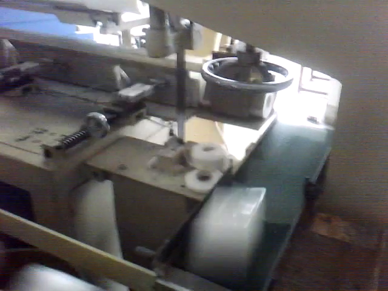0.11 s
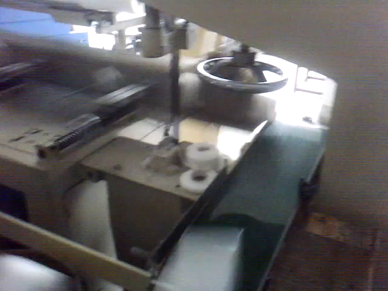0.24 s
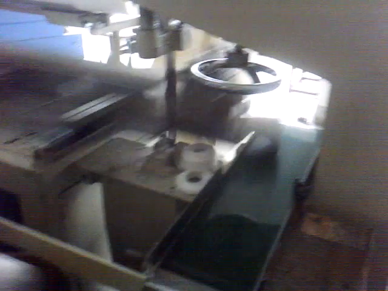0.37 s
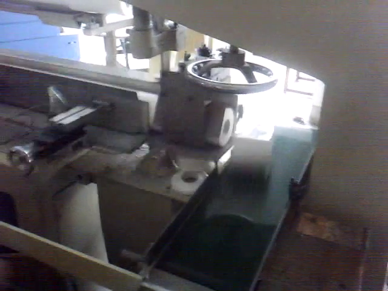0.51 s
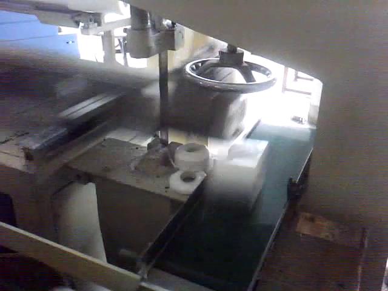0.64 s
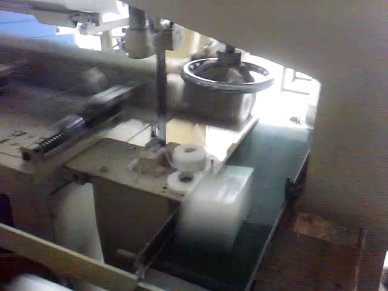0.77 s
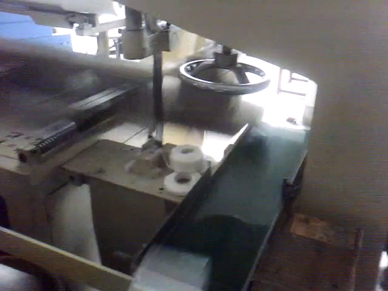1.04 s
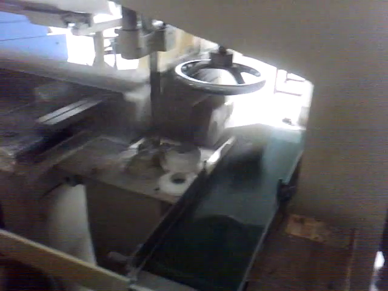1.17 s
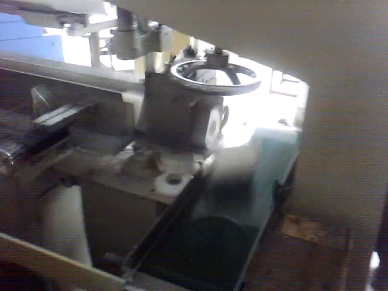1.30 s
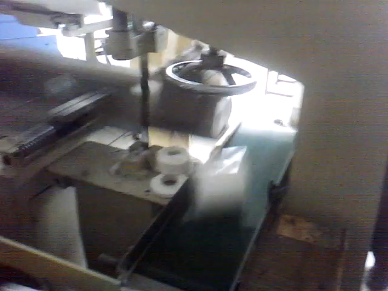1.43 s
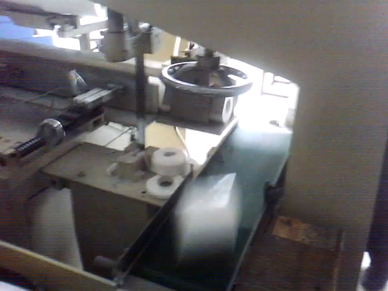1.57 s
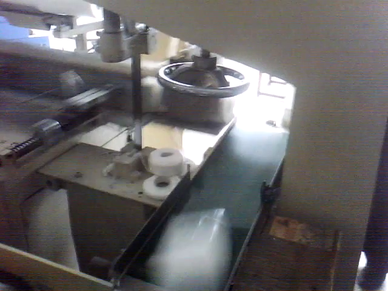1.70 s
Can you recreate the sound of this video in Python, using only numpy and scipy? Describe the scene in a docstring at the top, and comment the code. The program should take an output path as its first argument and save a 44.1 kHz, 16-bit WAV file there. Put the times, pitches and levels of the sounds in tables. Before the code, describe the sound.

Loud industrial machine clatter starts abruptly and sinks to a low drone with knocks.

```python
"""A tissue converting machine in a workshop, heard through a small narrow-band microphone. At 0.21 s its roar
starts abruptly: rumble, frame drone, dense clatter and the hiss of running paper, all coloured by fixed
resonances, with whining gears and whistling bearings. Half a second later the roar sinks. Brief narrow bands of
noise, low to high, swell and fade with a watery sound, and the mechanism knocks as packs go down the belt."""
import sys
import numpy as np
from scipy import signal
from scipy.fft import rfft, irfft
from scipy.io import wavfile
from scipy.ndimage import uniform_filter1d

SR = 44100
rng = np.random.default_rng(int(sys.argv[2]) if len(sys.argv) > 2 else 0)


def bounce(signal):
    """Save signal as a 16-bit WAV file at the path given by the first command-line argument."""
    frames = np.transpose(np.atleast_2d(signal))
    limited = np.clip(frames, -1, 1)
    pcm = np.round(limited * 32767).astype(np.int16)
    wavfile.write(sys.argv[1], SR, pcm)


N = 79380
T = np.arange(N) / SR
HZ = np.maximum(np.arange(N // 2 + 1) * SR / N, 1)

# envelope of clatter and gears: (time [s], level [dB])
MID_LEVEL = [(.21, -22.5), (.26, -20.5), (.315, -18), (.4, -23), (.45, -21), (.53, -21.5), (.635, -20),
             (.72, -27.5), (.77, -37.5), (.815, -34), (.87, -40.5), (.99, -41.5), (1.075, -41), (1.14, -48),
             (1.24, -44), (1.41, -45), (1.52, -49), (1.56, -47), (1.62, -49.5), (1.71, -51.5), (1.8, -52.5)]
# envelope of paper hiss and bearings: (time [s], level [dB])
TREBLE_LEVEL = [(.21, -26.5), (.25, -28), (.31, -31), (.44, -29), (.53, -31), (.6, -29.5), (.7, -31),
                (.77, -42.5), (.83, -44.5), (.9, -45), (.99, -49), (1.045, -57.5), (1.12, -53),
                (1.17, -57.5), (1.23, -53), (1.3, -53.5), (1.41, -49.5), (1.52, -52), (1.6, -55),
                (1.7, -56.5), (1.8, -64)]


def from_db(db):
    """Decibels to gain."""
    return 10 ** (np.asarray(db) / 20)


def unit_rms(x):
    """Scale to rms 1."""
    return x / np.sqrt(np.mean(x ** 2) + 1e-20)


def envelope(points):
    """Gain over time from (time [s], level [dB]) points."""
    return from_db(np.interp(T, *np.transpose(points)))


def steady(x, window_s=0.028):
    """Even out slow random swings to rms 1."""
    return x / np.sqrt(uniform_filter1d(x ** 2, int(window_s * SR)) + 1e-20)


def noise_around(centre_hz, half_width_hz):
    """Noise around one frequency, rms 1; centred on 0 Hz, a slow drift."""
    gain = 1 / (1 + ((HZ - centre_hz) / half_width_hz) ** 2)
    return unit_rms(irfft(rfft(rng.standard_normal(N)) * gain, N))


def through_machine(drive, colour):
    """Shape an excitation by a broad colour and the machine's resonances; rms 1."""
    # modes of frame, rollers and guards: (frequency [Hz], width [Hz], lift [dB])
    resonances = [(146, 20, 4), (199, 18, 4), (432, 50, 2), (786, 25, 4), (955, 45, 5), (1163, 25, 5),
                  (1535, 50, 4), (1690, 25, 4), (2046, 35, 3), (2490, 70, 4), (2790, 60, 4), (3910, 55, 7),
                  (4670, 60, 5), (4925, 55, 7), (5320, 50, 3), (5720, 50, 3), (6150, 60, 4), (6675, 65, 9),
                  (7040, 40, 5)]
    hz, db = np.transpose(colour)
    gain_db = np.interp(np.log(HZ), np.log(hz), db, right=-120)
    for centre_hz, width_hz, lift_db in resonances:
        gain_db += lift_db / (1 + (2 * (HZ - centre_hz) / width_hz) ** 2)
    return steady(unit_rms(irfft(rfft(drive) * from_db(gain_db), N)))


def rattle(contacts_per_s=2500, spread_db=3, contact_share=0.62):
    """Dense small contacts of uneven size over smooth friction noise."""
    sizes = from_db(spread_db * np.minimum(rng.exponential(1, N), 4))
    signs = rng.choice([-1, 1], N)
    contacts = unit_rms(sizes * signs * (rng.random(N) < contacts_per_s / SR))
    return np.sqrt(contact_share) * contacts + np.sqrt(1 - contact_share) * rng.standard_normal(N)


def workshop(level_db=-53.5):
    """Even background noise, coloured by the machine's resonances."""
    # spectrum: (frequency [Hz], relative density [dB])
    colour = [(25, -8), (70, -3.5), (130, 15.5), (500, -4.5), (2000, -2), (2800, 1), (3200, -6),
              (4300, -11.5), (7000, -17.5), (7600, -43)]
    return from_db(level_db) * through_machine(rng.standard_normal(N), colour)


def friction_tone(hz, waver_hz, flutter_depth=0.55):
    """Friction-driven tone, wavering in pitch and strength; rms 1."""
    rate_hz = 1.8 * waver_hz
    phase = 2 * np.pi * np.cumsum(hz + waver_hz * noise_around(0, rate_hz)) / SR
    strength = 1 + flutter_depth * noise_around(0, rate_hz)
    return unit_rms(strength * np.sin(phase))


def whine():
    """Gears whine and bearings whistle around fixed pitches, following the roar's level."""
    # gear tones: (frequency [Hz], level re MID_LEVEL [dB])
    gear_tones = [(147, -20.5), (200, -19), (424, -26), (786, -24.5), (951, -22.5), (1000, -15),
                  (1163, -33.5), (1418, -22), (1531, -23), (1690, -31.5), (1739, -25.5), (2045, -27.5)]
    # bearing tones: (frequency [Hz], level re TREBLE_LEVEL [dB])
    bearing_tones = [(4915, -16), (6681, -13), (7043, -19.5)]
    gears = sum(from_db(db) * friction_tone(hz, waver_hz=5.3) for hz, db in gear_tones)
    bearings = sum(from_db(db) * friction_tone(hz, waver_hz=12) for hz, db in bearing_tones)
    return envelope(MID_LEVEL) * gears + envelope(TREBLE_LEVEL) * bearings


def narrow_band(hz, spread_hz, clean_spread_hz=45):
    """A line in a band of noise, the broader the noisier; rms 1."""
    noise = noise_around(hz, spread_hz)
    line = unit_rms(np.sin(2 * np.pi * (hz * T + rng.random())))
    line_share = np.exp(-spread_hz / clean_spread_hz)
    return steady(np.sqrt(line_share) * line + np.sqrt(1 - line_share) * noise)


def swells():
    """Brief narrow bands of noise, low to high, swell and fade with a watery sound."""
    # (peak time [s], length [s], frequency [Hz], spread [Hz], peak level [dB])
    swell_rows = [(0.243, 0.046, 6680, 25, -31.5), (0.307, 0.053, 533, 20, -23),
                  (0.435, .018, 4600, 104, -26), (.441, 0.093, 950, 12, -31),
                  (.596, 0.044, 5520, 160, -30.5), (0.619, 0.14, 1660, 260, -23.5),
                  (.625, 0.072, 1003, 130, -23.5), (.684, 0.031, 426.6, 15, -18.5),
                  (.683, 0.15, 5310, 76, -36), (0.714, 0.039, 4150, 200, -46),
                  (.72, 0.077, 6100, 140, -41.5), (0.686, .2, 6710, 83, -34),
                  (0.716, 0.061, 233.7, 12, -25.5), (.738, 0.029, 415, 40, -22),
                  (0.817, .056, 398, 40, -28.5), (0.721, 0.07, 1576, 51, -27.5),
                  (0.776, 0.065, 296.3, 18, -29), (.756, .09, 815, 35, -33), (0.791, .115, 1545, 25, -34),
                  (.82, .12, 6900, 86, -42), (.823, 0.075, 926, 42, -30), (.825, .06, 1057, 39, -36),
                  (0.838, .16, 245, 22, -35), (.846, 0.043, 1920, 25, -35.5), (0.86, 0.099, 5447, 31, -38),
                  (.905, 0.068, 7068, 53, -46), (0.911, 0.054, 4680, 28, -44),
                  (0.899, 0.078, 6665, 33, -39), (0.917, 0.08, 939, 46, -35),
                  (0.904, 0.072, 5230, 110, -40), (0.927, 0.14, 2534, 45, -46),
                  (.905, .05, 370.5, 31, -33.5), (0.953, 0.055, 430.6, 30, -35),
                  (0.964, 0.14, 6650, 50, -44), (0.973, 0.15, 5390, 190, -42.5),
                  (0.992, 0.057, 4925, 22, -39.5), (.997, .074, 121, 12.4, -32.5),
                  (1.027, 0.16, 662, 145, -36), (1.06, 0.075, 1560, 44, -39.5),
                  (1.08, 0.059, 1062, 41, -39.5), (1.098, 0.046, 840, 40, -39),
                  (1.224, 0.055, 6720, 49, -55), (1.429, 0.19, 436, 21, -42), (1.433, 0.13, 6680, 31, -46),
                  (1.39, .089, 954, 94, -47.5), (1.561, 0.051, 1060, 31, -50), (1.567, 0.069, 262, 43, -47),
                  (1.592, .055, 417, 25, -39.5), (1.657, 0.053, 518.5, 12, -46),
                  (1.68, 0.054, 294.6, 6.4, -35), (1.724, 0.034, 295, 9, -40), (1.71, 0.06, 6710, 28, -57)]
    out = np.zeros(N)
    for peak_s, length_s, hz, spread_hz, db in swell_rows:
        position = np.clip((T - peak_s) / length_s, -.5, .5)
        arch = np.abs(np.cos(np.pi * position)) ** 0.8  # slightly flattened top
        out += from_db(db) * arch * narrow_band(hz, spread_hz)
    return out


def blow(age_s, rise_s, hold_s, t60_s):
    """Impact envelope: linear attack, hold, exponential tail."""
    decay = np.exp(-np.log(1000) * np.maximum(age_s - hold_s, 0) / t60_s)
    return np.clip(age_s / rise_s, 0, 1) * decay


def knocks():
    """The mechanism knocks: a crack at first contact, a short clack, a slower thump of the frame."""
    # impacts: (time [s], thump level [dB], clack level [dB])
    impacts = [(0.426, -44.5, -23), (.526, -26.5, -34.5), (.583, -48.5, -27), (0.797, -46, -34.5),
               (0.966, -28, -44.5), (1.036, -39, -51), (1.204, -47, -55), (1.262, -45, -50.5),
               (1.474, -43, -49), (1.639, -34, -41.5)]
    # spectra: (frequency [Hz], relative density [dB])
    thump_colour = [(20, -8.5), (45, -10.5), (72, -21), (98, -30), (122, 12), (170, -13.5), (400, -3.5),
                    (520, -7), (750, -28), (1500, -55.5)]
    clack_colour = [(300, -16.5), (550, -7.5), (1000, -11.5), (1450, -2.5), (2000, -0.5), (2400, -12),
                    (2900, -15.5), (3600, -25), (4700, -14.5), (7000, -23), (7600, -52)]
    thump_noise = through_machine(rng.standard_normal(N), thump_colour)
    clack_noise = through_machine(rattle(), clack_colour)
    out = np.zeros(N)
    for start_s, thump_db, clack_db in impacts:
        age_s = T - start_s
        crack = from_db(-3.5) * blow(age_s, rise_s=0.00079, hold_s=0, t60_s=0.014)
        clack = blow(age_s, rise_s=0.00079, hold_s=0.0044, t60_s=0.088)
        thump = blow(age_s, rise_s=0.015, hold_s=0.017, t60_s=0.069)
        out += from_db(clack_db) * clack_noise * (crack + clack)
        out += from_db(thump_db) * thump_noise * thump
    return out


def roar():
    """Rumble, frame drone, clatter and paper hiss, with a broad rush at first."""
    # envelopes: (time [s], level [dB])
    rumble_level = [(.21, -26.5), (.3, -31), (.38, -28), (.44, -21), (.54, -28.5), (.64, -37.5), (.72, -33),
                    (.78, -37), (.885, -37.5), (.915, -56.5), (.95, -62), (.975, -36), (1.05, -30.5),
                    (1.132, -35.5), (1.15, -64), (1.19, -47), (1.235, -36), (1.31, -53.5), (1.4, -52),
                    (1.48, -44), (1.52, -59), (1.59, -50), (1.66, -52), (1.72, -52), (1.8, -73)]
    drone_level = [(.21, -21.5), (.26, -24.5), (.4, -23), (.52, -24.5), (.68, -22), (.712, -35),
                   (.74, -24.5), (.81, -27.5), (.88, -32.5), (.92, -45), (.95, -41), (.975, -31),
                   (1.05, -30), (1.09, -39.5), (1.138, -35), (1.15, -52), (1.19, -50.5), (1.24, -44.5),
                   (1.32, -45), (1.49, -41), (1.525, -50.5), (1.59, -44.5), (1.625, -52), (1.66, -47.5),
                   (1.74, -51.5), (1.8, -59)]
    rush_level = [(.21, -33), (.29, -31.5), (.44, -30), (.53, -32), (.59, -45), (.65, -65), (.71, -57),
                  (.77, -46), (1.0, -69)]
    # spectra: (frequency [Hz], relative density [dB])
    rumble_colour = [(20, -23.5), (68, -23), (92, -15.5), (118, 1), (150, 0.5), (235, -1), (290, -15.5),
                     (450, -56.5)]
    drone_colour = [(150, -66), (225, -5.5), (265, -1.5), (420, 1), (520, -3.5), (600, -14), (720, -12),
                    (1100, -61)]
    clatter_colour = [(380, -37.5), (540, 1.5), (640, 3), (950, 1.5), (1300, 0.5), (1600, 0), (2030, 0.5),
                      (2220, -5), (2750, -9), (3000, -24), (3600, -22.5), (4300, -32), (6000, -49.5)]
    hiss_colour = [(2800, -33), (3600, -14.5), (4300, -8.5), (4650, -6.5), (5250, 2.5), (6000, 1),
                   (6400, 0), (6750, -3), (7150, -3.5), (7430, -15.5), (7650, -45)]
    rush_colour = [(1800, -19), (2400, 2), (2900, -1.5), (3300, -5.5), (4200, -9), (4600, -2.5),
                   (5200, -3.5), (7300, -23.5), (7700, -42.5)]
    rumble = envelope(rumble_level) * through_machine(rng.standard_normal(N), rumble_colour)
    drone = envelope(drone_level) * through_machine(rng.standard_normal(N), drone_colour)
    clatter = envelope(MID_LEVEL) * through_machine(rattle(), clatter_colour)
    hiss = envelope(TREBLE_LEVEL) * through_machine(rattle(), hiss_colour)
    rush = envelope(rush_level) * through_machine(rattle(), rush_colour)
    return rumble + drone + clatter + hiss + rush


def scene():
    """Workshop and machine cut in together; mono."""
    start_s = 0.210
    mix = workshop() + roar() + knocks() + whine() + swells()
    return (mix * (T >= start_s))[None]


def record(dry):
    """Small microphone: slightly rounded peaks, steep low-pass."""
    cutoff_hz = 7800
    lowpass = signal.ellip(10, .1, 75, cutoff_hz, fs=SR, output="sos")
    return signal.sosfilt(lowpass, np.tanh(dry))


dry = scene()
out = record(dry)
bounce(out)
```